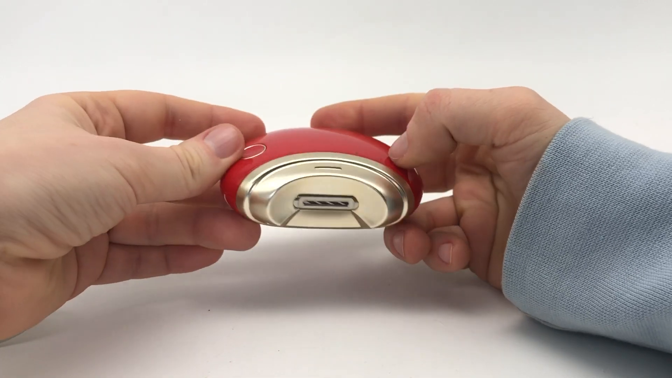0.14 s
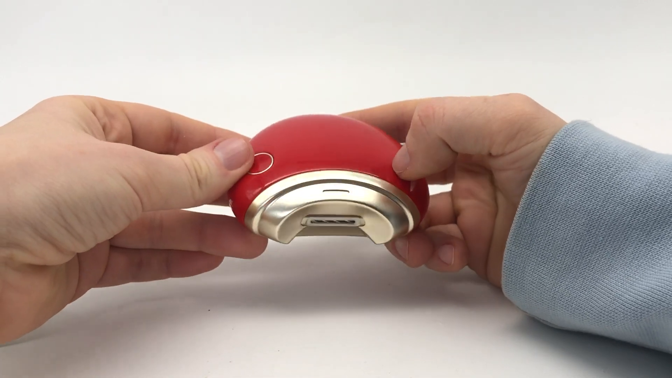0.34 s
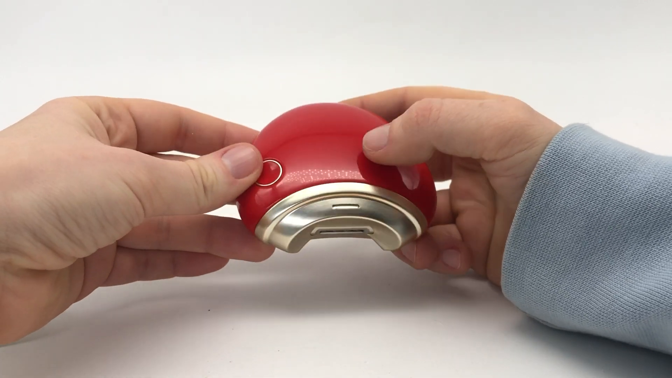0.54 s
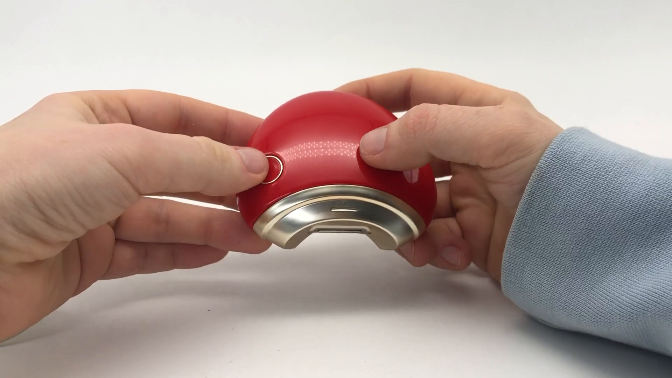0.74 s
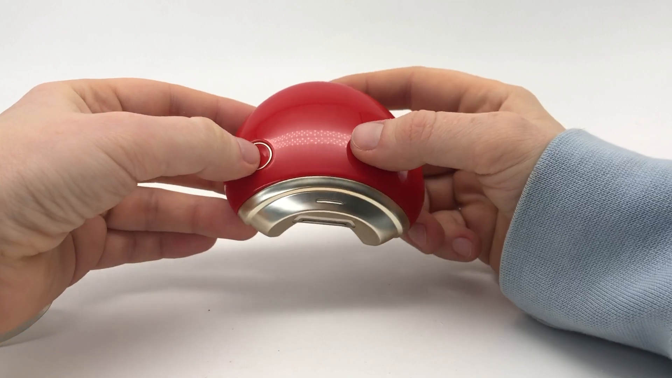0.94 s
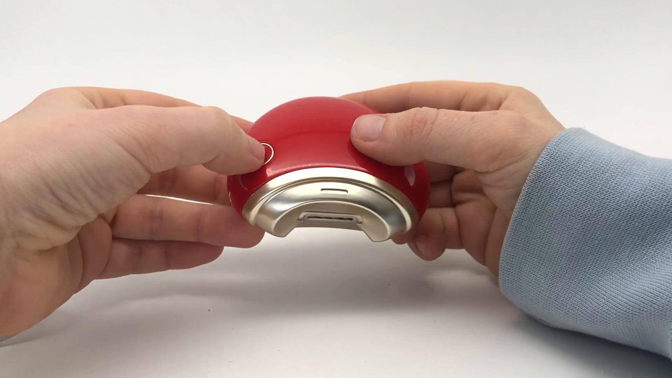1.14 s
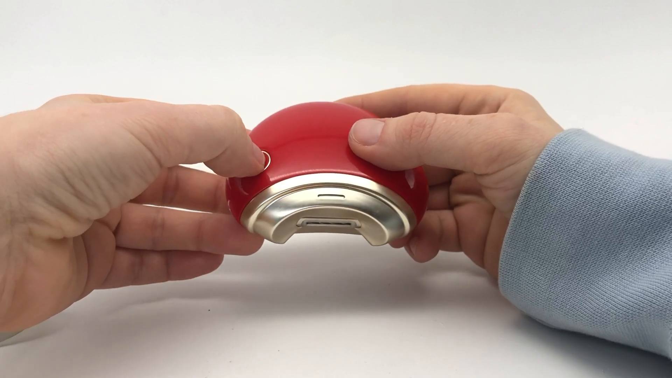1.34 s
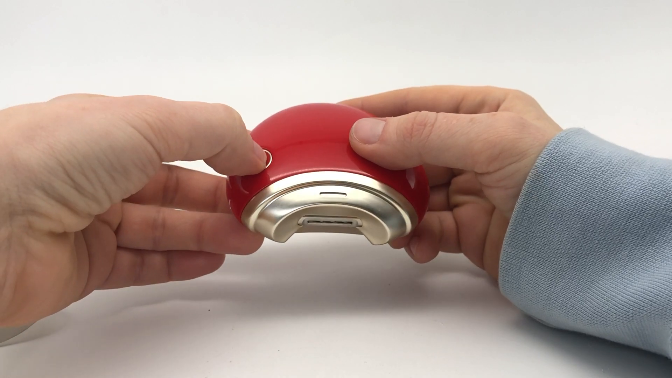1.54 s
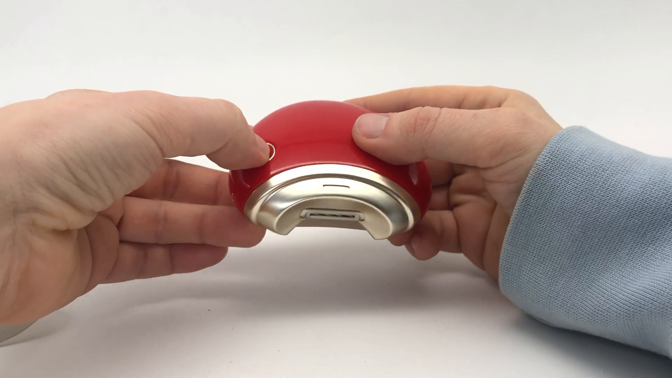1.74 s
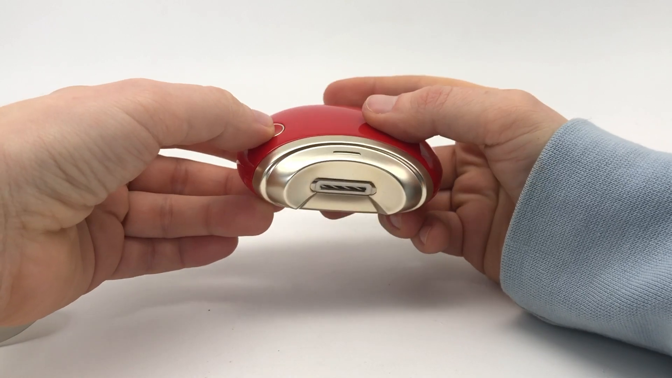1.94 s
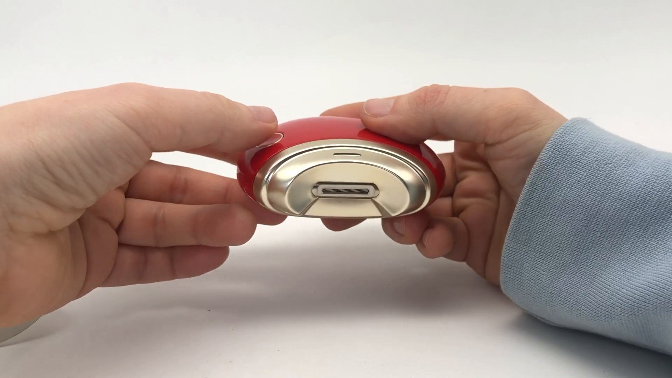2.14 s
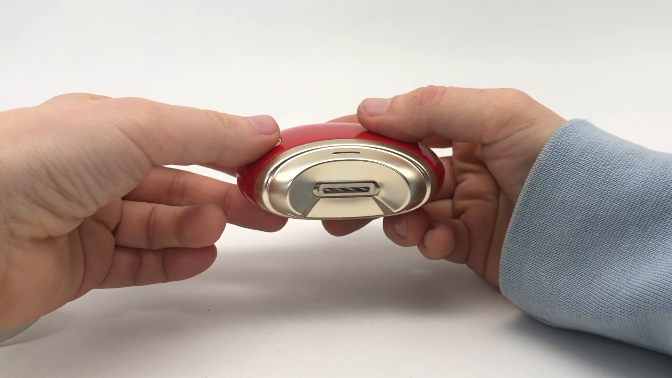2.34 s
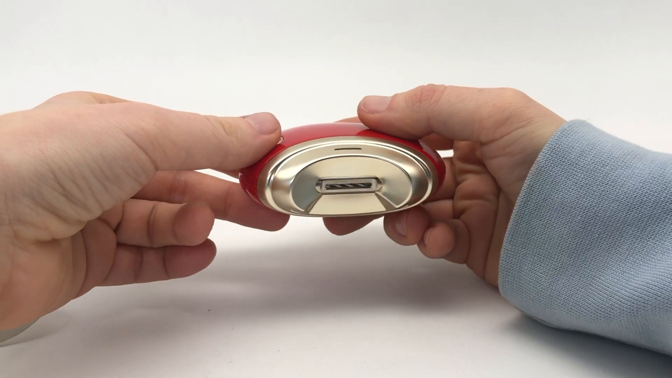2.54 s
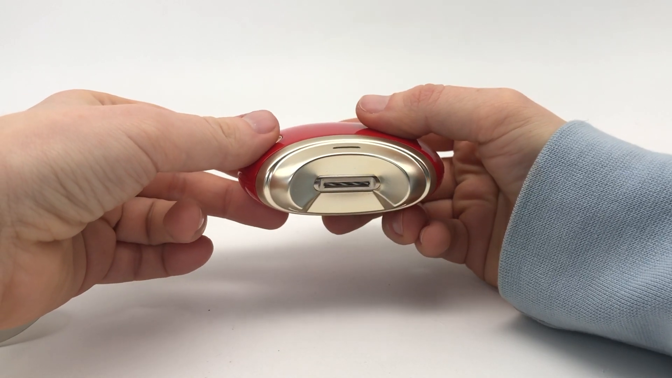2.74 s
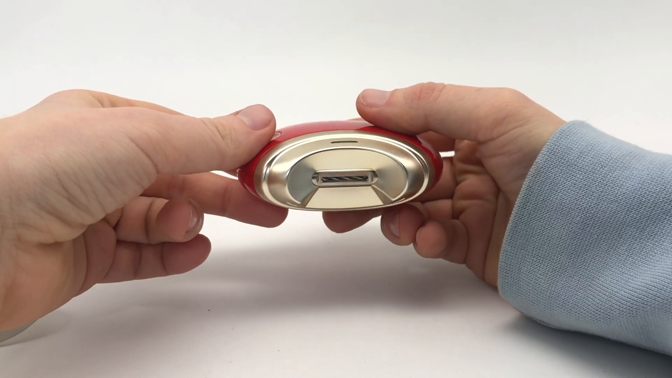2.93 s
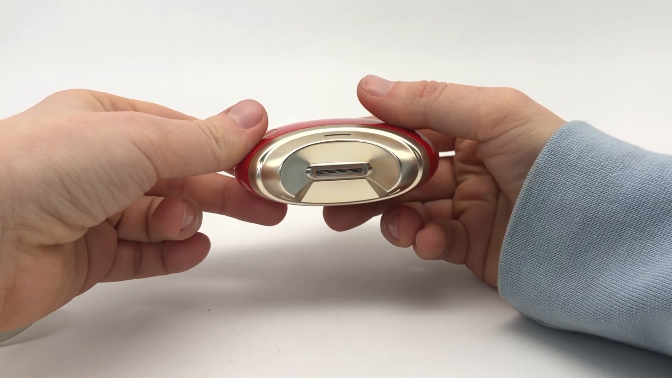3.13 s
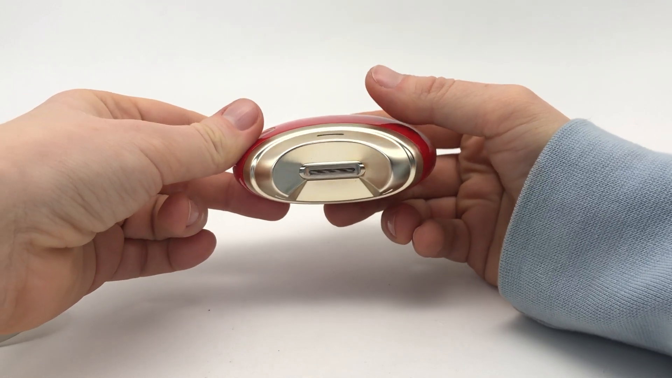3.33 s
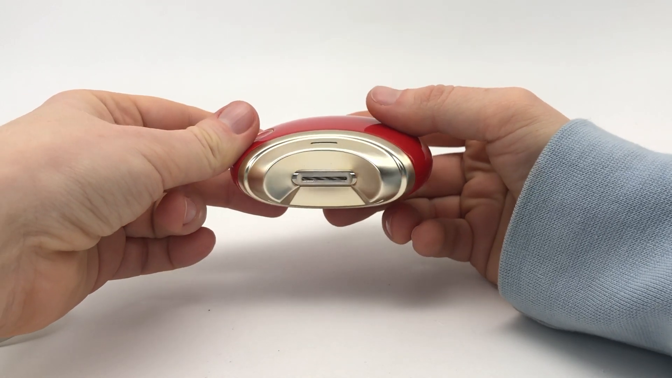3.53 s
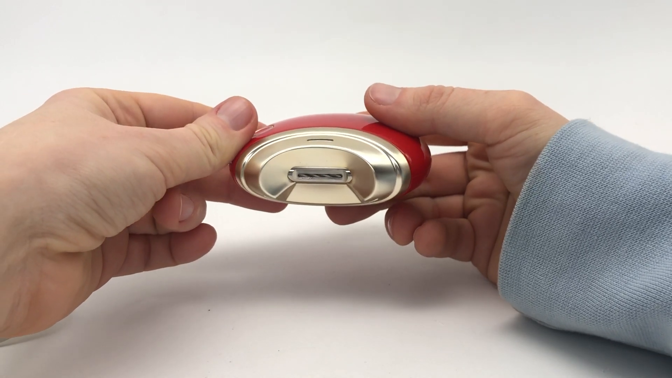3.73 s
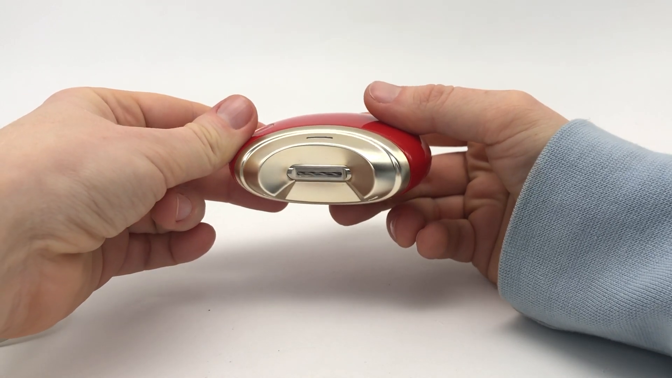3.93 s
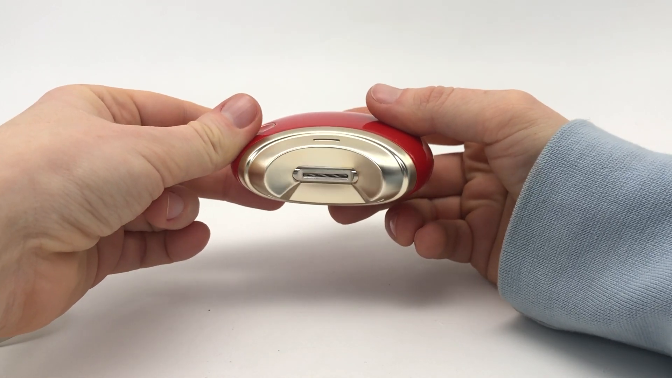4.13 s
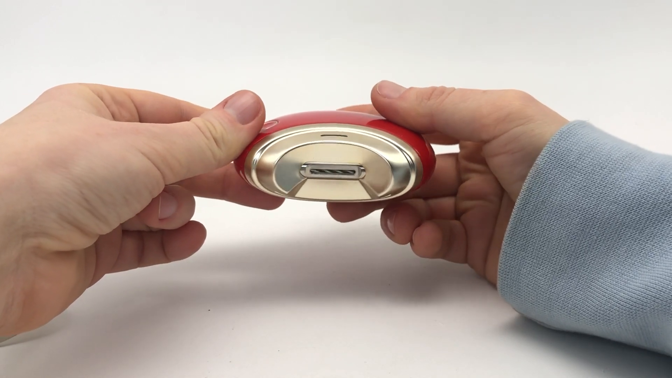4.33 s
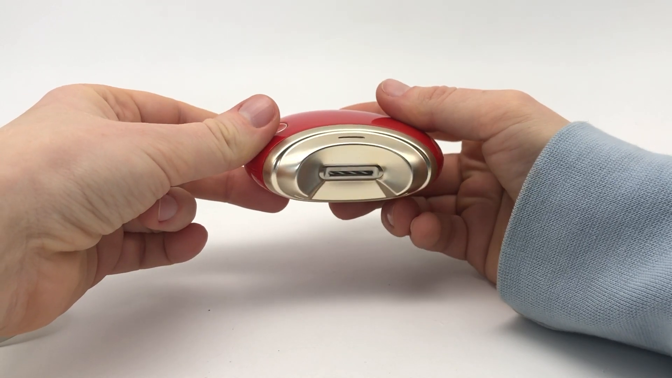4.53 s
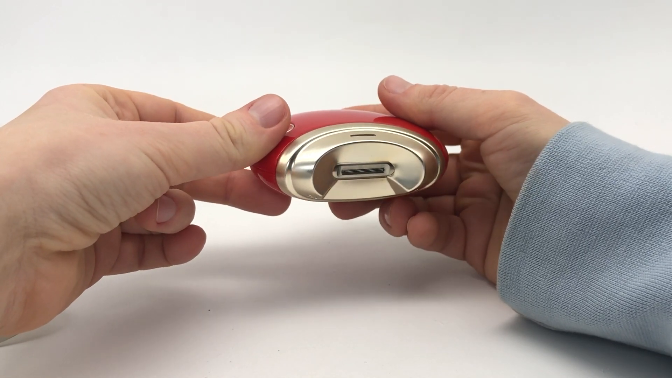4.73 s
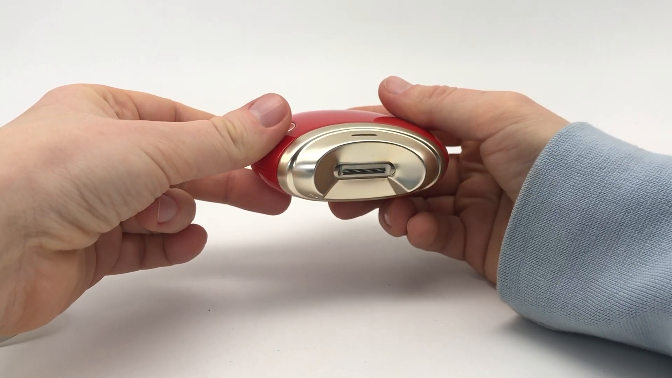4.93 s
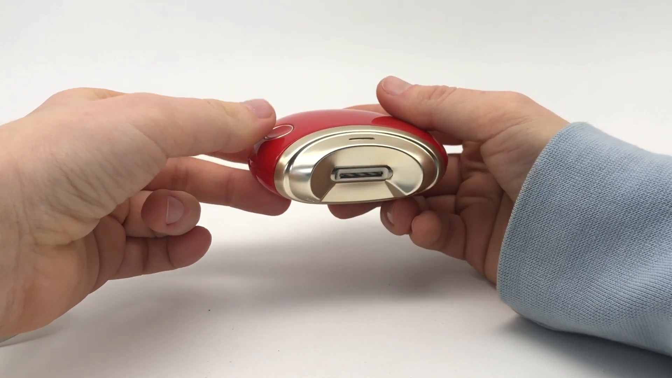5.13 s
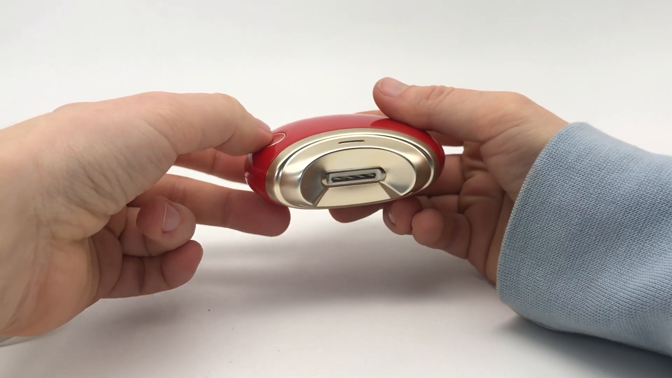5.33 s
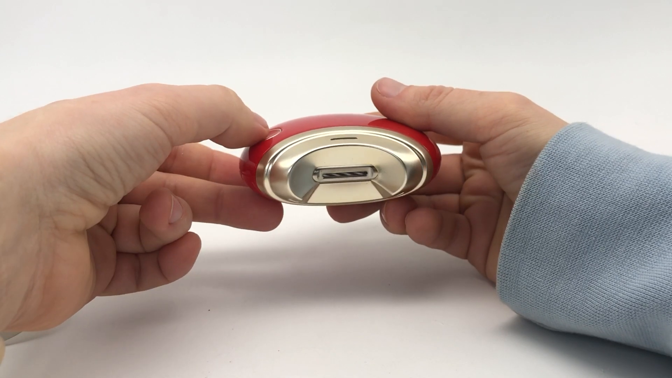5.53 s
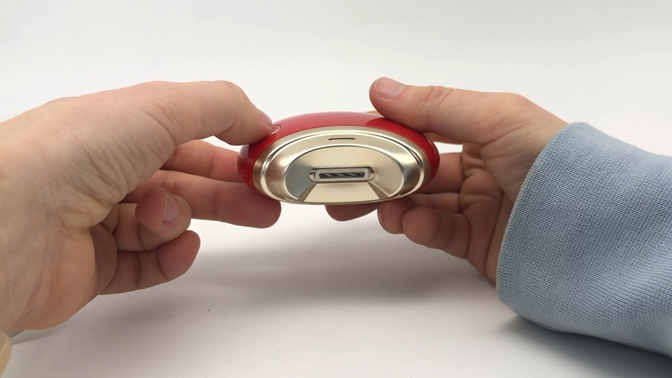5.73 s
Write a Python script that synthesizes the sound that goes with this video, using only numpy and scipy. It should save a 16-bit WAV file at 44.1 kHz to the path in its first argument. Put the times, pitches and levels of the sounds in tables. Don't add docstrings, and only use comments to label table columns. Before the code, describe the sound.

Close view of a small plastic-shelled electric cutter in two hands, in a quiet room. Faint finger creaks and one hard nail tap come first, over low rumble and soft hiss. A button click at about 1.6 seconds instantly starts the motor, which holds a steady, nasal whine with gritty gear rattle and irregular bright ticks, still running at the end.

```python
import sys
import numpy as np
from scipy import signal
from scipy.fft import rfft, irfft, next_fast_len
from scipy.io import wavfile
from scipy.ndimage import uniform_filter1d

SR = 44100
rng = np.random.default_rng(int(sys.argv[2]) if len(sys.argv) > 2 else 0)


def ratio_of_db(decibels):
    return 10 ** (np.asarray(decibels, float) / 20)


def int16_out(signal):
    q = np.round(np.clip(np.atleast_2d(signal).T, -1, 1) * 32767)
    wavfile.write(sys.argv[1], SR, q.astype(np.int16))


N = 258867
T = np.arange(N) / SR
START_S = 1.652
RUN = np.maximum(T - START_S, 0)
MAIN_ORDER = 15
WHEEL, CUTTER_SHAFT = 36 / 10, 36 / 10 * 32 / 12
THUMB_S, PALM_S, REGRIP_S = 2.99, 4.42, 0.025


def level(x, db):
    return x * ratio_of_db(db) / np.sqrt(np.mean(x ** 2))


def colour(x, points, lo_hz=0., hi_hz=SR):
    size = next_fast_len(len(x))
    hz = np.fft.rfftfreq(size, 1 / SR) + 1
    point_hz, point_db = np.array(points)[:, 0], np.array(points)[:, 1]
    shape = np.interp(np.log(hz), np.log(point_hz), point_db)
    gate = (np.tanh(30 * (1 - lo_hz / hz)) - np.tanh(30 * (1 - hi_hz / hz))) / 2
    return irfft(rfft(x, size) * ratio_of_db(shape) * gate, size)[:len(x)]


def walk(rate, size=N):
    hold = max(int(SR / rate), 1)
    steps = np.repeat(rng.standard_normal(size // hold + 1), hold)
    smooth = uniform_filter1d(uniform_filter1d(steps, hold), hold)[:size]
    return smooth / smooth.std()


def after(s):
    return (1 + np.tanh((T - s) / REGRIP_S)) / 2


def shaft():
    speed = 1 - np.exp(-RUN / .015)
    main_hz = 1180.8 + 6 * np.exp(-RUN / .3) + .6 * walk(12) + .5 * walk(3)
    return speed, np.cumsum(main_hz / MAIN_ORDER * speed) / SR


# multiple of the shaft speed, level/dB beside the main tone
SHAFT_ORDERS = [(9, -23.5), (10, -24.5), (12, -22.5), (13, -37), (14, -27.5), (19, -20.5), (20, -10.5),
                (21, -12), (22, -17.5), (24, -25), (26, -16.5), (27, -13.5), (28, -18), (29, -11), (30, -9),
                (33, -10.5), (34, -10), (36, -14), (40, -38), (50, -24.5)]
# from t/s, to t/s, multiple of the shaft speed, level/dB
WHISTLES = [(4.35, 5.7, 141, -87), (4.35, 5.4, 147, -89), (4.4, 5.8, 135, -89), (1.8, 3.1, 165, -90),
            (1.8, 3.0, 147, -89), (1.7, 5.87, 105, -84), (1.7, 5.87, 66, -76), (1.7, 5.87, 63, -79),
            (1.7, 5.87, 58, -79)]


def whine(speed, turns):
    main_db = -49.5 + 2 * after(THUMB_S)
    tones = np.sin(2 * np.pi * MAIN_ORDER * turns) * ratio_of_db(0.34 * walk(20) + main_db)
    for order, db in SHAFT_ORDERS:
        strength = ratio_of_db(db + main_db + 0.86 * walk(4.94))
        tones += strength * np.sin(2 * np.pi * (round(order) * turns + rng.random()) + 0.3 * walk(6))
    for start, end, order, db in WHISTLES:
        fade = np.clip(np.minimum(T - start, end + .1 - T) / 0.077, 0, 1)
        strength = fade * ratio_of_db(db + 2.0 * walk(18.0))
        tones += strength * np.sin(2 * np.pi * round(order) * turns + 0.63 * walk(40))
    return tones * np.sqrt(2) * speed ** 9


def chatter(size, rate, spread_db):
    return level(rng.standard_normal(size) * ratio_of_db(spread_db * walk(rate, size)), 0)


def wear(turns, span):
    steps_per_turn = 560
    size = round(steps_per_turn * span)
    place = (turns * steps_per_turn).astype(int) % size
    mix = walk(1.505)
    old, new = chatter(size, 500, 2.1)[place], chatter(size, 500, 2.1)[place]
    return np.cos(mix) * old + np.sin(mix) * new


def tooth_knocks(turns):
    motor, wheel, pairs = wear(turns, 1), wear(turns, WHEEL), wear(turns, 18)
    angle = 2 * np.pi * turns
    throb = 1 + .2 * np.cos(angle) + .17 * np.cos(3 * angle) + .1 * np.cos(5 * angle)
    throb += .12 * np.cos(angle / WHEEL) + .12 * np.cos(2 * angle / WHEEL + 1)
    throb += .13 * np.cos(6 * angle / WHEEL) + .17 * np.cos(12 * angle / WHEEL)
    loose = chatter(N, 220, 1.9) * ratio_of_db(1.2 * walk(16))
    knocks = throb * (loose + ratio_of_db(-2) * wheel + ratio_of_db(-1) * pairs) + ratio_of_db(-19) * motor
    fine = throb * (loose + ratio_of_db(-8) * pairs) + ratio_of_db(1) * motor
    return knocks, fine


def band(knocks, hz, db, size):
    slow = uniform_filter1d(uniform_filter1d(knocks * (T > START_S), size), size)
    slow = slow / slow[T > START_S].std()
    return slow * np.sqrt(2) * np.cos(2 * np.pi * np.cumsum(hz) / SR) * ratio_of_db(db)


# f/Hz, level/dB per Hz
SHELL = [(500, -39.5), (800, -27), (1080, -22), (1220, -15.5), (1330, -12.5), (1450, -11.5), (1700, -13.5),
         (1800, -12.5), (1900, -13.5), (2000, -15.5)]
# f/Hz, level/dB per Hz
DOME = [(1980, -22), (2100, -2.5), (2200, -6.5), (2370, 1.5), (2470, -3), (2620, 2.5), (2720, -1),
        (2850, -7), (3080, -12), (3350, -10), (3550, -13), (3650, -14), (3870, -17.5), (4300, -21.5)]


def shell_rattle(knocks, wobble, palm_db):
    body_db = -44.5 - 3.5 * np.exp(-RUN / 0.23)
    bite = 1 + 0.5 * np.exp(-RUN / 0.057)
    lower = level(colour(knocks, SHELL, hi_hz=2027), -56) * bite
    dome = level(colour(knocks * (1 + wobble), DOME, lo_hz=2016, hi_hz=3107), -0.75) * ratio_of_db(body_db)
    upper = level(colour(knocks, DOME, lo_hz=3108, hi_hz=4260), -0.35) * ratio_of_db(-54.5 + palm_db)
    boom = band(knocks, 1230 + 0 * T, -48, size=100) * np.exp(-((T - 1.676) / 0.013) ** 2)
    return lower + dome + upper + boom


# f/Hz, level/dB per Hz
CUTTER = [(4300, -10.5), (4600, -3.5), (5050, -7.5), (5700, -3.5), (6300, -4), (6650, -9), (7200, -8.5),
          (7900, -16), (8300, -16.5), (8700, -16.5), (9400, -14.5), (10300, -22), (11300, -20.5),
          (15700, -35)]
# t/s, tilt/0-1
TILT = [
    (1.7, .8),
    (2.1, .7),
    (2.22, .15),
    (3.1, .2),
    (3.6, 1.),
    (4.1, 1.),
    (4.4, .8),
    (5.2, .75),
    (5.42, 0),
    (5.87, 0),
]


def cutter_rattle(knocks, fine, wobble, palm_db):
    tilt = np.interp(T, *np.transpose(TILT))
    turned = tilt ** 4
    ring_db = -60.5 - .5 * RUN + palm_db
    plate_db = -57 - 2.5 * tilt - 0.38 * RUN
    sizzle_db, split_hz = -67.5 - 0.26 * RUN, 7850
    blades = colour(knocks * (1 + 0.096 * wobble), CUTTER, lo_hz=4290, hi_hz=5445)
    plate = colour(knocks, CUTTER, lo_hz=5440, hi_hz=7200)
    low_sizzle = colour(fine, CUTTER, lo_hz=7030, hi_hz=split_hz)
    high_sizzle = colour(fine, CUTTER, lo_hz=split_hz)
    out = level(blades, -0.4) * ratio_of_db(ring_db) + level(plate, -3) * ratio_of_db(plate_db)
    out += level(low_sizzle, -3) * ratio_of_db(sizzle_db)
    out += level(high_sizzle, -3) * ratio_of_db(sizzle_db - 1.5 * turned)
    out += ratio_of_db(-5) * band(knocks, 5690 + 540 * tilt, plate_db, size=64)
    out += band(knocks, 8290 + 0 * T, -71 - 11 * turned, size=80)
    return out


def rattle(turns):
    knocks, fine = tooth_knocks(turns)
    angle = 2 * np.pi * turns
    load_peak = angle[int(4.735 * SR)]
    depth = .2 + (.42 - .2) * after(PALM_S)
    wobble = depth * np.cos((angle - load_peak) / CUTTER_SHAFT)
    palm_db = -1.5 * after(PALM_S)
    out = shell_rattle(knocks, wobble, palm_db) + cutter_rattle(knocks, fine, wobble, palm_db)
    return out * ratio_of_db(-7.5 * np.exp(-RUN / 0.011)) * np.clip((T - START_S) / 0.00063, 0, 1)


def bursts(events, width):
    out, t = np.zeros(N + SR // 10), np.arange(SR // 20) / SR
    for s, db, hz, ms in events:
        points = [(hz / 2, -width), (hz, 0), (hz * 2, -width), (hz * 4, -2 * width)]
        burst = level(colour(rng.standard_normal(len(t)), points), db - 5.0)
        start = int(s * SR)
        out[start:start + len(t)] += burst * np.exp(-t * 2000 / ms)
    return out[:N]


# t/s, peak level/dB, centre f/Hz
TICKS = [(1.7712, -48, 8300), (1.7981, -50, 10200), (1.8635, -45.5, 8950), (1.9019, -53, 8230),
         (1.9786, -46, 8260), (2.0391, -55, 8090), (2.0735, -41, 9100), (2.289, -47.5, 8930),
         (2.3229, -42, 8390), (2.3972, -48, 8150), (2.502, -52, 8280), (2.5863, -53, 8270),
         (2.7155, -45, 8360), (2.7894, -55, 8100), (2.9295, -44.5, 8880), (3.3556, -51, 9380),
         (4.2096, -50, 9150), (4.884, -42.5, 8450), (5.0627, -51, 9150), (5.2024, -53, 8260),
         (5.2767, -51, 8340), (5.5581, -56, 8300)]


def ticks():
    length_ms, blade_hz = 5.3, 4750
    bright = bursts([(s, db - 1, hz, length_ms) for s, db, hz in TICKS], width=35)
    return bright + bursts([(s, db - 2, blade_hz, length_ms) for s, db, _ in TICKS], width=55)


def ring(hits, modes, crack, crack_db, crack_t60):
    t = np.arange(SR // 8) / SR
    body = np.zeros(len(t))
    for k, (hz, db, t60) in enumerate(modes):
        body += (-1) ** k * ratio_of_db(db) * np.sin(2 * np.pi * hz * t) * np.exp(-np.log(1000) * t / t60)
    dense = level(colour(rng.standard_normal(len(t)), crack), crack_db)
    dense *= np.exp(-np.log(1000) * t / crack_t60)
    return signal.fftconvolve(hits, body / np.abs(body).max() + dense)[:N]


# t/s, level/dB
TAP = [
    (.7746, -46),
    (.7765, -31.5),
    (.7778, -47),
    (.7812, -58),
]
# f/Hz, level/dB, time to fade by 60 dB/s
TAP_MODES = [(556, -6, .03), (1740, -7, 0.023), (2020, -2, 0.033), (2740, -11, .02), (3165, -16, .03),
             (3500, 8, 0.0091), (6480, -2, .03), (6480, -5, .055), (7180, -13, 0.049), (9150, 0, 0.015),
             (11030, -10, .02), (12800, -3, 0.0083)]
# f/Hz, level/dB per Hz
TAP_CRACK = [(400, -30), (560, -1), (1050, -17), (2000, -2), (3500, -11), (5500, -10), (6850, 0.5),
             (7750, -13), (12500, -17), (15700, -30)]


def nail_tap():
    hits = np.zeros(N)
    for s, db in TAP:
        hits[int(s * SR)] = ratio_of_db(db)
    return ring(hits, TAP_MODES, TAP_CRACK, crack_db=-13, crack_t60=0.049)


# t/s, level/dB, contact time/ms
BUTTON = [
    (1.6293, -40, 0.055),
    (1.6294, -27, 0.026),
    (1.635, -48, .05),
    (1.640, -50, .05),
    (1.8126, -44, .05),
    (1.8125, -27, 0.2),
    (4.075, -41, 0.46),
]
# f/Hz, level/dB, time to fade by 60 dB/s
BUTTON_MODES = [(314, -8, 0.016), (550, -2.5, 0.015), (795, -1.5, 0.0086), (1010, -2, 0.007),
                (1330, -3, 0.0099), (2400, -10.5, 0.0087), (3440, -8, 0.0085), (5970, 4.5, 0.0046),
                (11100, -0.5, 0.0026)]
# f/Hz, level/dB per Hz
BUTTON_CRACK = [(300, -21), (560, -7), (1000, -10), (1800, -15), (2500, 2), (3500, -4.5), (4500, -4),
                (6000, -13), (11500, -14), (15700, -35)]


def button_clicks():
    hits = np.zeros(N)
    for s, db, ms in BUTTON:
        push = np.hanning(int(ms * SR / 500) + 3)
        start = int(s * SR)
        hits[start:start + len(push)] += ratio_of_db(db) * push / push.sum()
    return ring(hits, BUTTON_MODES, BUTTON_CRACK, crack_db=-15, crack_t60=0.036)


# t/s, peak level/dB, centre f/Hz, length/ms
CREAKS = [
    (0.0766, -63, 12000, 5.5),
    (0.2532, -63.5, 2200, 16),
    (0.3989, -62, 5230, 24),
    (0.3989, -62, 9900, 22),
    (0.7436, -67, 4800, 17),
    (1.2786, -66, 4900, 9),
    (1.2786, -66, 9000, 8),
    (1.3997, -61.5, 6100, 22),
    (1.3997, -63, 10200, 22),
]


def finger_creaks():
    return bursts(CREAKS, width=31)


def walls(near):
    t = np.arange(SR // 4) / SR
    tail = rng.standard_normal(len(t)) * np.exp(-np.log(1000) * t / 0.081)
    return ratio_of_db(-8.5) * signal.fftconvolve(near, tail / np.linalg.norm(tail))[:N]


# f/Hz, level/dB per Hz
RUMBLE = [(22, -36), (32, -25), (42, -10), (55, 2), (65, -3), (75, -4.5), (100, -8), (125, -7), (165, -0.5),
          (185, -6), (260, -13), (400, -15)]
# f/Hz, level/dB per Hz
ROOM = [(240, -24), (400, 1.5), (445, -1), (945, -11.5), (1570, -15), (3040, -17.5), (9030, -18.5),
        (13300, -23), (15700, -26)]


def room():
    noise = rng.standard_normal((3, N))
    deep = level(colour(noise[0], RUMBLE, hi_hz=110.0), 0.47)
    deep *= ratio_of_db(-67.5 - 0.43 * walk(2.52))
    upper = level(colour(noise[1], RUMBLE, lo_hz=110.4, hi_hz=392), 0.11)
    upper *= ratio_of_db(-67 - 0.43 * walk(3.014) + 0.58 * walk(8))
    hiss = level(colour(noise[2], ROOM, lo_hz=394) * ratio_of_db(.5 * walk(5.1)), -73.5)
    return deep + upper + hiss


def scene():
    speed, turns = shaft()
    near = rattle(turns) + nail_tap() + button_clicks() + finger_creaks() + ticks()
    echo = walls(near)
    return (whine(speed, turns) + near + echo + room())[None]


def top_cut(x):
    return signal.sosfilt(signal.butter(12, 16040, fs=SR, output="sos"), x)


def record(dry):
    top = signal.ellip(14, .2, 60, 15730, fs=SR, output="sos")
    mix = signal.sosfilt(top, dry)
    return top_cut(mix)


dry = scene()
out = record(dry)
int16_out(out)
```